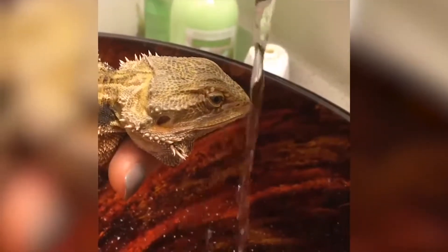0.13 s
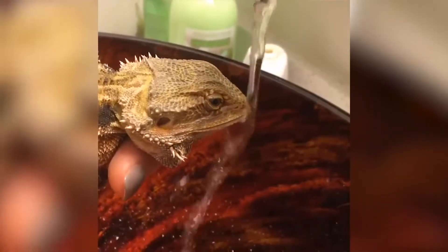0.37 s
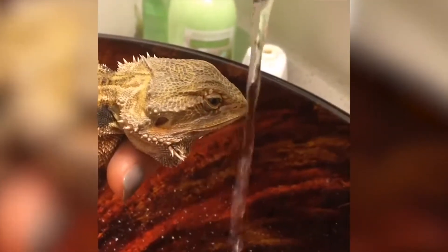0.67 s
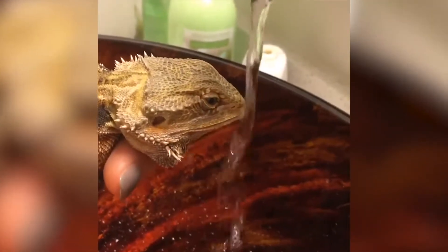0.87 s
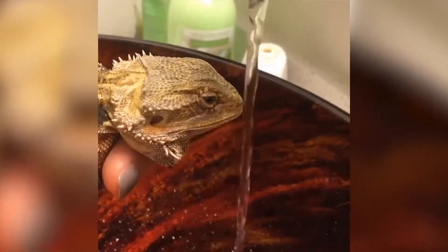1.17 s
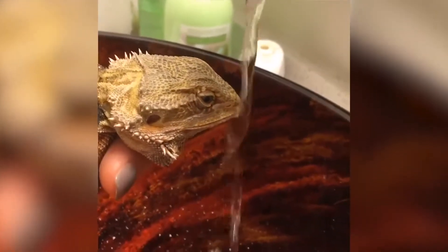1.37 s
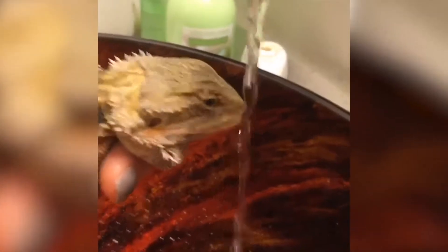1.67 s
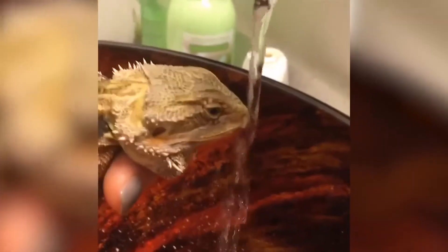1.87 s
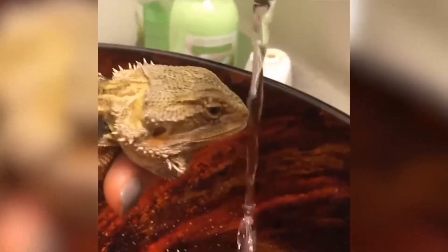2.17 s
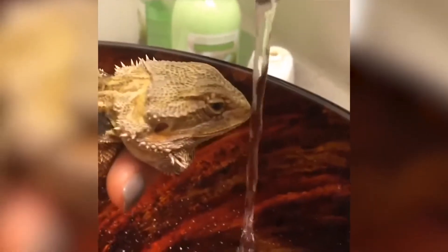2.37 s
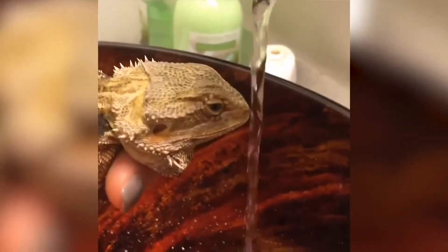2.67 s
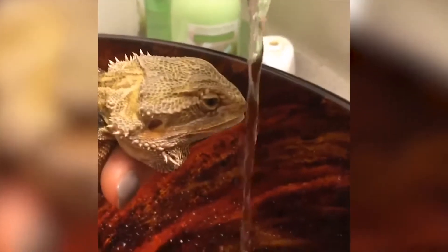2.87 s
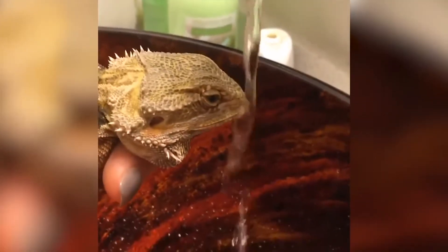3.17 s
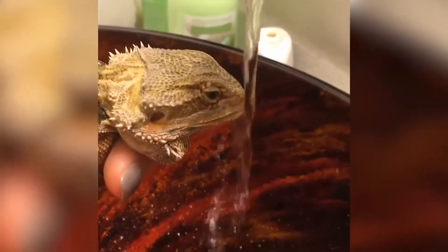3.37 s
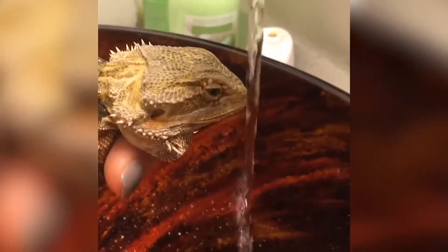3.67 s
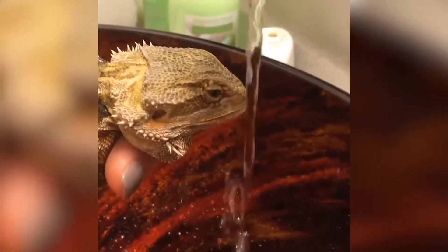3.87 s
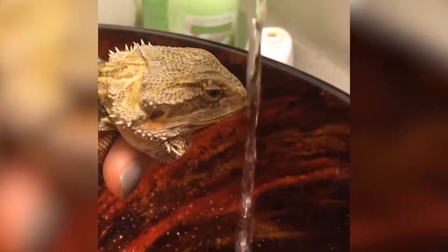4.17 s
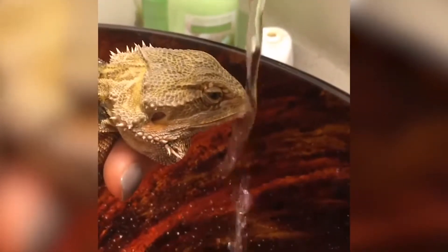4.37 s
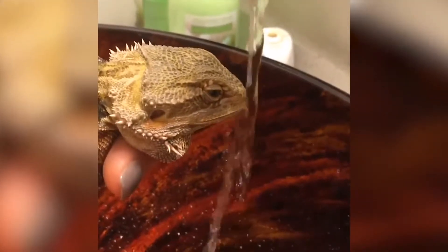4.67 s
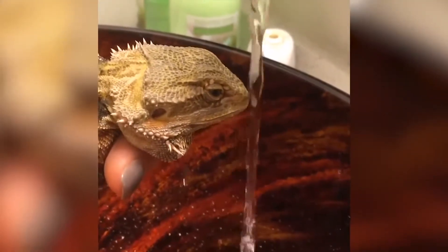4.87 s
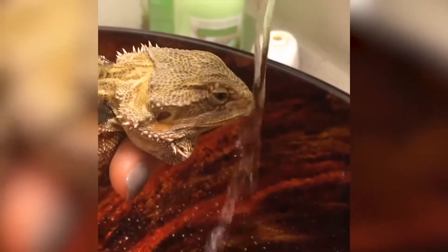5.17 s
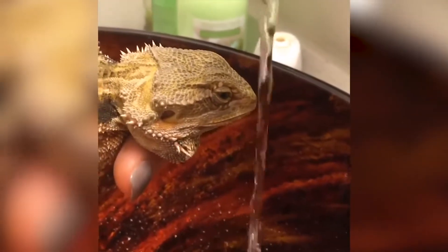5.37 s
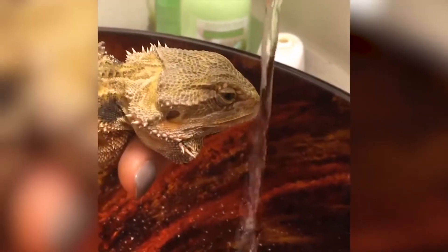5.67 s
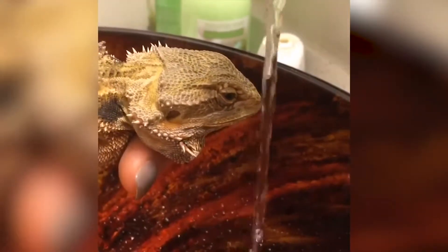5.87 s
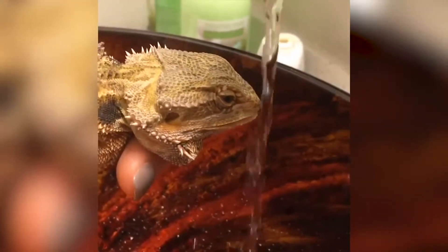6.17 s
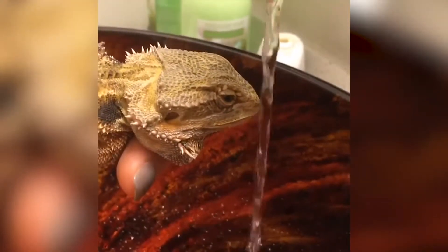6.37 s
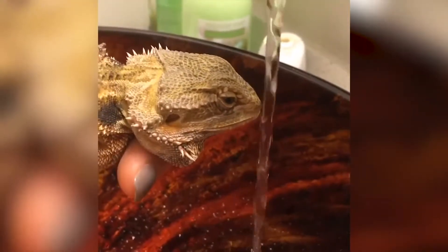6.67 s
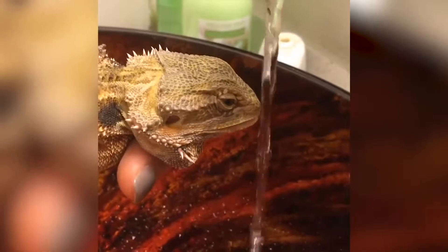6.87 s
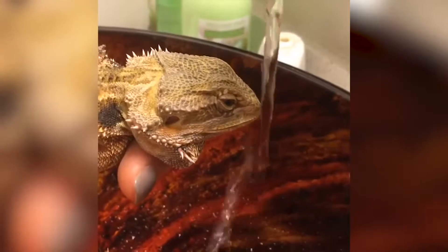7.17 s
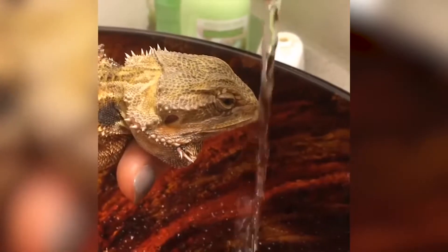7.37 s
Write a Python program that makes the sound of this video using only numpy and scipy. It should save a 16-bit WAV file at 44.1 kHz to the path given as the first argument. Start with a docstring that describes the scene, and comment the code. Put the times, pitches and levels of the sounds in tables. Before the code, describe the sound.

Close, quiet running water: fine hiss with a faint whistle, scattered drops plinking in a drain, tiny snaps of spray and occasional soft gurgles.

```python
"""A bathroom with small-room echoes: a thin stream runs from a tap into a basin, close to a mono microphone.
Turbulence, as shaped noise, hisses through the spout's narrow resonances and whistles thinly.
Drops trap bubbles, as dying sines of rising pitch, that plink through the modes of the hollow drain pipe.
Spray ticks and fizzes on the bowl; a few low glugs and soft bumps sound over a low, uneven rumble."""
import sys
import numpy as np
from scipy import signal
from scipy.fft import rfft, irfft
from scipy.io import wavfile
from scipy.ndimage import uniform_filter1d

SR = 44100
rng = np.random.default_rng(int(sys.argv[2]) if len(sys.argv) > 2 else 0)


def wav_record(signal):
    """Record a signal, one row per channel, as 16-bit PCM in the file named by sys.argv[1]."""
    frames = np.transpose(np.atleast_2d(signal))
    bounded = np.clip(frames, -1, 1)
    # unit amplitude maps onto the largest positive 16-bit level
    quanta = np.round(bounded * 32767).astype(np.int16)
    wavfile.write(sys.argv[1], SR, quanta)


N = 332073
TIME = np.arange(N) / SR  # s
TOP_HZ = 13850  # upper edge of the audible band, Hz


def undb(db):
    """Logarithmic level: decibels become an amplitude gain."""
    return 10 ** (np.asarray(db) / 20)


def unit(x):
    """Mean power: scale to rms 1."""
    return x / np.sqrt(np.mean(x ** 2))


def add(track, start, sound):
    """Superposition: add a sound to the track at a time in seconds."""
    i = int(np.clip(start * SR, 0, N - 1))
    track[i:i + len(sound)] += sound[:N - i]


def colour(x, points):
    """Spectral shaping: filter by (f/Hz, level/dB) points, joined along log frequency."""
    hz, db = np.transpose(points)
    f = np.maximum(np.fft.rfftfreq(N, 1 / SR), 1)
    gain = undb(np.interp(np.log(f), np.log(hz), db))
    return irfft(rfft(x) * gain, N)


def resonate(x, hz, width):
    """Simple resonance: one mode of given bandwidth, gain 1 at its centre."""
    b, a = signal.iirpeak(hz, hz / width, fs=SR)
    return signal.lfilter(b, a, x + 1e-18)  # the tiny offset keeps the filter out of denormal numbers


def walk(rate):
    """Random modulation: smoothed chance steps, rate per second, with a spread near 1."""
    k = int(SR / rate)
    steps = np.repeat(rng.standard_normal(N // k + 1), k)
    smooth = uniform_filter1d(uniform_filter1d(steps, k), k)
    return 1.3 * smooth[:N]


def ring(hz, t60, glide=0.):
    """Free damped oscillation: falls 60 dB in t60 while its pitch rises by the share glide."""
    t = TIME[:int(SR * np.clip(t60, .001, .2))]
    phase = 2 * np.pi * hz * t * (1 + glide * t / t60 / 2)
    return np.sin(phase) * np.exp(-np.log(1000) * t / t60)


def bubble(hz, cycles, glide=.06, swell_cycles=.8):
    """Volume pulsation of trapped air: a bubble swells over swell_cycles, then rings, rising in pitch."""
    tone = ring(hz, cycles / hz, glide)
    return tone * (1 - np.exp(-TIME[:len(tone)] * hz / swell_cycles))


def gulp(hz, length, swell, rise, tremble_db=2.0, tremble_s=0.0065):
    """Modulated oscillation: a bubble note swells, trembles and stops quickly; peak near 1."""
    t = TIME[:int(3 * length * SR)]
    tremble = undb(tremble_db * np.interp(t / tremble_s, np.arange(48), rng.standard_normal(48)))
    envelope = (1 - np.exp(-t / swell)) * np.exp(-(t / length) ** 2)
    phase = 2 * np.pi * hz * t * (1 + rise * t / length / 2)
    return np.sin(phase) * tremble * envelope / envelope.max()


def eddies(resonances, broad):
    """Turbulence noise: a flat power floor, broad, plus resonant peaks of (f/Hz, width/Hz, level/dB)."""
    f = np.fft.rfftfreq(N, 1 / SR)
    power = broad + sum(undb(db) ** 2 / (1 + (2 * (f - hz) / width) ** 2) for hz, width, db in resonances)
    return irfft(rfft(rng.standard_normal(N)) * np.sqrt(power), N)


def room(x, wet_db, t60, first_echo_s=0.0007, bass_hz=700, bass_stretch=1.96):
    """Diffuse reverberation: dense echoes die in t60, and bass_stretch times as slowly in the bass."""
    t = TIME[:SR // 2]
    echoes = rng.standard_normal(len(t))
    bass = signal.sosfiltfilt(signal.butter(3, bass_hz, fs=SR, output="sos"), echoes)
    fade = np.exp(-np.log(1000) * t / t60)
    tail = (echoes - bass) * fade + bass * fade ** (1 / bass_stretch)
    tail = tail * (t > first_echo_s)
    return x + undb(wet_db) * signal.fftconvolve(x, tail / np.linalg.norm(tail))[:len(x)]


# modes of the basin's hollow body: (f/Hz, level/dB, width/Hz)
BASIN_MODES = [(67.5, 10.5, 11), (113, 17.5, 10), (132.7, 10.5, 4.2), (250, 2.5, 27), (319, -5, 100),
               (372.6, 6.5, 8.2), (402, 3.5, 27), (548, -4, 24), (760, -20, 24), (970, -1, 51)]


def basin(x, plain_db=-16):
    """Modal resonance: the basin's body booms beside the plain sound."""
    return undb(plain_db) * x + sum(undb(db) * resonate(x, hz, width) for hz, db, width in BASIN_MODES)


# air-column modes of the drain pipe: (f/Hz, level/dB, width/Hz)
DRAIN_MODES = [(589, -2, 40), (993, -0.5, 50), (1303, -2, 45), (1733, 3.5, 55), (1995, -3.5, 55),
               (2383, 3, 48), (2770, -3, 48), (3295, -1, 55), (3601, -1, 50)]


def drain(x, direct_db=-14):
    """Air-column resonance: bubbles sound partly direct, mostly through the pipe's modes."""
    return undb(direct_db) * x + sum(undb(db) * resonate(x, hz, width) for hz, db, width in DRAIN_MODES)


# spectrum of the drumming: (f/Hz, relative level per Hz/dB)
RUMBLE_SPECTRUM = [(25, -39), (45, -11), (70, -1), (88, 0), (102, 0), (118, 2), (145, -5), (195, -22.5),
                   (380, -27.5), (600, -29.5), (1200, -76)]
# the drumming slowly comes and goes: (t/s, mean level/dB)
RUMBLE_LEVEL = [(0, -61.5), (1.5, -65), (3.6, -64), (4.25, -60), (4.7, -68), (5.2, -62.5), (5.9, -61),
                (6.35, -66), (7.53, -60)]


def rumble(swing_db=2.5, burble_db=-76, burble_swing_db=4, burble_low_hz=200, burble_high_hz=480):
    """Random forcing: the stream drums softly and unevenly on the basin, with a burble above the rumble."""
    drum_db = np.interp(TIME, *np.transpose(RUMBLE_LEVEL)) + swing_db * walk(13)
    drum = unit(colour(rng.standard_normal(N), RUMBLE_SPECTRUM)) * undb(drum_db)
    band = signal.butter(2, [burble_low_hz, burble_high_hz], "band", fs=SR, output="sos")
    burble = signal.sosfilt(band, basin(rng.standard_normal(N)))
    return drum + unit(burble) * undb(burble_db + burble_swing_db * walk(6.1))


def gurgle(count=70, level_db=-58, range_db=10, low_hz=130, octaves=1.71, fall_db_per_octave=4, length_s=0.014):
    """Random superposition: water swirling down the waste keeps up a faint, lumpy gurgle of low notes."""
    out = np.zeros(N)
    for when, faintness, pitch in rng.random((count, 3)):
        db = level_db - range_db * faintness - fall_db_per_octave * octaves * pitch
        note = gulp(low_hz * 2 ** (octaves * pitch), length_s, length_s / 3, 0.032)
        add(out, when * N / SR, undb(db) * note)
    return out


# soft bumps and rubs against the basin: (t/s, level/dB, length/s, band bottom f/Hz, band top f/Hz)
BUMPS = [(0.0, -53, 0.088, 128, 600), (1.772, -49.5, 0.0065, 178, 1000), (1.803, -64, 0.0068, 200, 1000),
         (0.82, -56.5, 0.13, 100, 190), (4.13, -59, 0.11, 60, 159), (5.111, -54.5, 0.11, 80, 190),
         (5.998, -48.5, 0.048, 74.6, 184), (6.441, -63.5, 0.096, 200, 900),
         (6.518, -56.5, 0.091, 224, 1090), (6.988, -60, 0.055, 60, 422), (7.24, -59.5, 0.078, 80, 450),
         (6.528, -48, 0.059, 64, 168), (6.561, -48.5, 0.025, 60.5, 169)]


def bumps(rise_share=0.04, slips_per_s=110, lumpy_db=4, scrape_db=-9):
    """Stick-slip friction: a short run of uneven slips and a little scraping excite the basin's body."""
    out = np.zeros(N)
    t = TIME[:SR]
    for start, db, length, low_hz, top_hz in BUMPS:
        gaps, sizes = rng.uniform(-1, 1, (2, 64))
        times = np.r_[0, np.cumsum(1 + .7 * gaps[1:])] / slips_per_s + rise_share * length
        kicks = undb(lumpy_db * sizes) * rng.choice([-1, 1], len(sizes))
        slips = np.bincount((times * SR).astype(int), kicks, SR)[:SR]
        force = slips * np.sqrt(SR / slips_per_s) + undb(scrape_db) * rng.standard_normal(SR)
        push = np.minimum(t / (rise_share * length), 1) * np.exp(-(t / length) ** 4)
        band = signal.butter(3, [low_hz, top_hz], "band", fs=SR, output="sos")
        thud = basin(signal.sosfilt(band, force * push))
        # the level holds for the time of the push, not for the whole second
        add(out, start, undb(db) * unit(thud) * np.sqrt(np.mean(push ** 2)))
    return out


# low glugs in the waste pipe:
# (t/s, peak level before trembling/dB, f/Hz, length/s, swell/s, pitch rise as a share over that length)
GLUGS = [(0.003, -45, 274.5, 0.026, .004, .03), (0.012, -45, 558, 0.016, 0.0018, 0.03),
         (0.08, -58, 317, 0.055, .004, .03), (0.133, -50.5, 275, 0.013, .004, 0.037),
         (0.312, -59, 282, 0.019, .004, 0.037), (0.82, -57.5, 367, .035, 0.0033, .04),
         (0.884, -58.5, 350, .025, .005, 0.035), (0.9272, -32.5, 523, 0.0073, 0.0037, 0.038),
         (0.942, -34.5, 557, 0.0098, .008, .04), (0.957, -40.5, 568, .011, .008, 0.042),
         (0.984, -58, 755, .018, .01, 0.49), (0.999, -51, 580, 0.027, .004, .01),
         (1.078, -59, 381, 0.033, .015, .03), (3.835, -41.5, 560, 0.017, 0.0024, 0.044),
         (4.212, -33, 581, .02, 0.0018, 0.023), (5.116, -56.5, 377, 0.022, .005, 0.048),
         (5.148, -55.5, 300, .018, .004, .04), (5.216, -63, 363, 0.024, 0.0037, .03),
         (5.531, -63, 367, .025, .004, 0.031), (5.999, -45.5, 318, 0.013, .005, 0.09),
         (6.018, -44, 370, 0.015, 0.0036, .07), (6.039, -45, 341, .018, .004, .07),
         (6.081, -55, 386, 0.036, .008, 0.022), (6.277, -49, 985, 0.023, .025, .01),
         (6.335, -48, 966, 0.014, 0.0067, 0.017), (6.432, -58.5, 582, 0.024, .012, 0.045),
         (6.435, -57, 331, 0.036, 0.01, 0.026), (6.476, -57, 245, 0.022, .005, .04),
         (6.514, -57, 715, .012, .003, 0.046), (6.531, -47.5, 269, 0.018, 0.0032, .08),
         (6.558, -48, 372, 0.021, 0.0036, 0.073), (6.575, -52, 280, 0.017, 0.0037, .08),
         (6.609, -53, 370, .035, .008, 0.018), (6.668, -56.5, 388, 0.022, .008, .05),
         (7.251, -58, 375, 0.029, .008, .05)]


def glugs(count=4, after_db=-21, after_s=.04, after_octaves=0.32, after_length_s=0.0055):
    """Low bubble resonance: large bubbles gulp in the waste pipe; a few small ones break off each."""
    out = np.zeros(N)
    for start, db, hz, length, swell, rise in GLUGS:
        add(out, start, undb(db) * gulp(hz, length, swell, rise))
        for when, pitch in rng.random((count, 2)):
            chip = gulp(hz * 2 ** (after_octaves * pitch), after_length_s, after_length_s / 2, rise)
            add(out, start + when * after_s, undb(db + after_db) * (1 - when / 2) * chip)
    return out


# a burst of splatter on the bowl: (t/s, starting level/dB, decay time to 1/e/s)
SPLATTER = (0.0, -45, 0.055)
# spectrum of the splatter: (f/Hz, relative level per Hz/dB)
SPLATTER_SPECTRUM = [(100, -14), (300, -5), (560, -1), (1100, -7), (1500, -12), (2500, -6), (3500, -13),
                     (4400, -10), (8000, -16.5), (13000, -21)]


def splatter(count=1500, scatter_db=4):
    """Impulsive shot noise: a dense shower of tiny impacts, hard at first and quickly dying away."""
    start, db, decay = SPLATTER
    when, sign = rng.random((count, 2)).T
    delay = 4 * decay * when
    hits = undb(scatter_db * rng.standard_normal(count)) * np.sign(sign - .5) * np.exp(-delay / decay)
    # a second of silence in front keeps the filter from wrapping round
    impacts = np.bincount(((start + delay) * SR).astype(int) + SR, hits, N)
    shower = colour(impacts, SPLATTER_SPECTRUM)[SR:]
    starting_rms = np.sqrt(np.sum(shower ** 2) / (decay * SR / 2))
    return np.r_[undb(db) * shower / starting_rms, np.zeros(SR)]


# tiny bubbles that sing for a moment on the bowl: (t/s, peak level before trembling/dB, f/Hz, length/s)
PIPS = [(0.557, -46, 5880, .008), (0.85, -58, 5880, .04), (3.628, -55, 3550, 0.037),
        (3.856, -45.5, 5690, 0.0095), (3.857, -50, 5240, .016), (6.341, -50, 5870, 0.025),
        (7.111, -55, 5260, .02)]


def pips(swell_s=0.0015, rise=0.003):
    """Small-bubble resonance: little trapped air sings a thin, high note."""
    out = np.zeros(N)
    for start, db, hz, length in PIPS:
        add(out, start, undb(db) * gulp(hz, length, swell_s, rise))
    return out


# a snap falls 60 dB within this many cycles, so the high ones are the shortest
TICK_CYCLES = 46
# spray that snaps on the bowl: (t/s, peak level/dB, f/Hz)
TICKS = [(1.684, -34, 11300), (4.065, -37, 5570), (4.0732, -24.5, 5400), (4.148, -36, 3550),
         (4.15, -38, 5200), (4.595, -25.5, 3700), (4.596, -24, 5500), (4.847, -32, 10900),
         (5.2013, -24.5, 7960), (5.303, -34.5, 11300), (6.305, -47, 11000), (7.398, -31, 7400)]


def ticks(splash_db=-4, splash_width=0.92, rise_s=0.000083):
    """Transient excitation: tiny bubbles snap in a very short ring with a burst of spray."""
    out = np.zeros(N)
    for start, db, hz in TICKS:
        t60 = TICK_CYCLES / hz
        tone = ring(hz, t60)
        t = TIME[:len(tone)]
        spray = resonate(rng.standard_normal(SR // 2), hz, hz * splash_width)
        spray = unit(resonate(spray, hz, hz * splash_width))[:len(t)]
        burst = undb(splash_db) * spray * np.exp(-np.log(1000) * t / t60)
        snap = (tone + burst) * (1 - np.exp(-t / rise_s))
        add(out, start, undb(db) * snap / np.abs(snap).max())
    return out


def fizz(count=6000, level_db=-53, range_db=9, centre_hz=5500, octaves=0.45, cycles=110, glide=0.011):
    """Incoherent summation: where the stream lands, countless pinhead bubbles merge into a fine rush."""
    out = np.zeros(N)
    for (when, faintness, length), pitch in zip(rng.random((count, 3)), rng.standard_normal(count)):
        hz = min(centre_hz * 2 ** (octaves * pitch), TOP_HZ)
        pinhead = bubble(hz, cycles * (.5 + length), glide, swell_cycles=10.6)
        add(out, when * N / SR, undb(level_db - range_db * np.sqrt(faintness)) * pinhead)
    return out


def patter(count=640, level_db=-39.0, range_db=14, centre_hz=1900, octaves=0.37, cycles=9):
    """Random arrivals: a dense, uneven trickle of faint droplets keeps exciting the drain."""
    out = np.zeros(N)
    for (when, faintness, length), pitch in zip(rng.random((count, 3)), rng.standard_normal(count)):
        droplet = bubble(centre_hz * 2 ** (octaves * pitch), cycles * (.5 + length))
        add(out, when * N / SR, undb(level_db - range_db * np.sqrt(faintness)) * droplet)
    return drain(out)


# clear drops, each trapping a bubble in the drain:
# (t/s, peak level before room echoes/dB, f/Hz, cycles until the bubble has died)
DROPS = [(0.015, -42, 1020, 7.1), (0.057, -45, 1310, 5), (0.106, -47, 2300, 7), (0.207, -48.5, 1760, 5.7),
         (0.609, -51, 1850, 3.4), (0.821, -43.5, 1680, 4.9), (0.893, -45, 2470, 3.7),
         (0.9275, -45, 1860, 8), (0.929, -47.5, 960, 19), (1.012, -46.5, 1980, 7), (1.104, -48, 1940, 5.4),
         (1.141, -45, 1680, 5.7), (1.156, -39, 1860, 10), (1.634, -40, 1770, 8.6), (1.653, -34, 2210, 2.5),
         (1.84, -46, 1810, 6.7), (1.988, -29, 2190, 9.5), (2.072, -42, 2100, 3.3), (2.196, -49, 1900, 4.3),
         (2.329, -48, 2330, 7), (2.447, -31.5, 1870, 5), (2.4724, -25, 985, 6.4), (2.473, -36, 1730, 15),
         (2.677, -50, 2010, 5), (2.702, -44, 2280, 14), (2.954, -53, 1800, 2.7), (3.136, -42, 2150, 4.2),
         (3.362, -46, 1730, 9.6), (3.4019, -37, 1760, 6.1), (3.4025, -40.5, 626, 2.5),
         (3.53, -43, 735, 4.7), (3.609, -46, 1880, 4), (3.621, -47, 1800, 6.4), (3.802, -44, 2370, 6.1),
         (3.837, -40.5, 1730, 2.2), (3.871, -47.5, 1810, 8), (3.9099, -34.5, 1360, 4.1),
         (3.911, -40.5, 574, 4), (3.941, -37, 1980, 9), (3.9471, -28.5, 950, 6.8), (3.975, -40, 1700, 7.4),
         (4.079, -39.5, 1420, 9.6), (4.114, -47, 1050, 7.1), (4.1546, -27, 1640, 7.9),
         (4.214, -42, 1740, 2.6), (4.416, -34, 2140, 5.2), (4.571, -32, 2600, 6.2), (4.787, -33, 1700, 13),
         (5.101, -33.5, 2160, 4.8), (5.279, -43, 2920, 1.9), (5.365, -33, 2720, 3.8),
         (5.442, -53, 1720, 12), (5.49, -46, 2010, 5), (5.513, -40, 1500, 3.5), (5.8004, -32.5, 1910, 2.8),
         (5.846, -47, 1900, 4.8), (5.934, -25, 2560, 2.6), (6.149, -47.5, 1780, 16),
         (6.3335, -38.5, 3240, 28), (6.334, -43.5, 1680, 16), (6.366, -48, 1730, 14),
         (6.461, -51, 1900, 3.3), (6.56, -47, 1750, 5.2), (6.7489, -31, 1500, 5.3), (6.915, -47, 1740, 8.6),
         (6.9285, -36, 760, 4), (7.034, -52, 1300, 20), (7.07, -46.5, 2150, 5.4), (7.091, -26.5, 1360, 8),
         (7.111, -39, 1660, 2.3), (7.13, -46, 1330, 26), (7.2027, -35.5, 1930, 18),
         (7.2303, -40, 1900, 3.3), (7.231, -51.5, 1000, 14), (7.354, -48, 1750, 8.4),
         (7.374, -49.5, 1740, 9)]


def drops(count=5, after_db=-12, after_s=.035, fade_db_per_s=300, after_octaves=0.22,
          splat_db=-20, splat_s=0.0093, splat_width=0.78):
    """Bubble entrainment: each drop splats, then sheds ever sparser, weaker bubbles; each has its own echoes."""
    out = np.zeros(N)
    t = TIME[:SR // 5]
    for start, db, hz, cycles in DROPS:
        first = bubble(hz, cycles)
        splat = resonate(rng.standard_normal(len(t)), hz, hz * splat_width)
        splat = unit(resonate(splat, hz, hz * splat_width))
        splash = undb(splat_db) * splat * np.exp(-t / splat_s) * np.abs(first).max()
        add(splash, 0, first)
        for k, (when, pitch) in enumerate(rng.random((count, 2))):
            delay = after_s * ((k + 1 + when) / (count + 1)) ** 2
            later = bubble(hz * 2 ** (after_octaves * (2 * pitch - 1)), cycles)
            add(splash, delay, undb(after_db - fade_db_per_s * delay) * later)
        plink = drain(splash)
        add(out, start, undb(db) * room(plink / np.abs(plink).max(), wet_db=-7.0, t60=0.15))
    return out


# resonances of the valve and spout: (f/Hz, width/Hz, level/dB)
SPOUT = [(1225, 40, 12), (1320, 60, 9), (2020, 40, 3), (2380, 35, 7), (2790, 60, 5), (3145, 34, 6),
         (4520, 18, 4.5), (4560, 22, 6), (4830, 45, 1.5), (5265, 30, 2), (5995, 36, 0.5), (6933, 16, 11),
         (8150, 80, 3), (8410, 50, 3), (10025, 22, 13), (10256, 22, 10), (10920, 150, 4), (13720, 150, 9)]
# broad hiss of the jet: (f/Hz, relative level per Hz/dB)
HISS_SPECTRUM = [(200, -12), (600, -8), (900, -11.5), (1450, -2), (2100, -8.5), (2550, -14), (3000, 0.5),
                 (4100, -4), (5800, 4.5), (7600, -1.5), (9100, -2.5), (10450, 4), (11200, 1.5),
                 (13200, -6.5)]
# the spout's thin whistle: (f/Hz, width/Hz, level/dB)
WHISTLE = [(8830, 60, -12), (8915, 50, -11), (9146, 26, -1.5), (9230, 80, -9), (9320, 40, -10),
           (9386, 30, -5)]
# the whistle slowly swells and eases: (t/s, level before whistle_db is added/dB)
WHISTLE_LEVEL = [(0.1, -57.5), (2.76, -57.5), (3.05, -54), (7.24, -57.5), (7.4, -56)]
# pitches that the spout swallows: (f/Hz, width/Hz)
SPOUT_NOTCHES = [(2590, 24), (9800, 315), (10490, 1300), (13000, 260)]


def tap(hiss_db=-53.5, whistle_db=1, flutter_db=2.14, waver_db=1.22, flicker_db=3.0):
    """Flow noise: turbulence in the valve hisses and rings the spout, which also whistles thinly."""
    hiss_level = hiss_db + flutter_db * walk(55)
    hiss = unit(colour(eddies(SPOUT, broad=0.28), HISS_SPECTRUM)) * undb(hiss_level)
    whistle_level = np.interp(TIME, *np.transpose(WHISTLE_LEVEL)) + whistle_db + waver_db * walk(14)
    whistle = unit(eddies(WHISTLE, broad=0)) * undb(whistle_level)
    jet = hiss + whistle
    for hz, width in SPOUT_NOTCHES:
        jet = jet - resonate(jet, hz, width)
    # the middle of the hiss flickers as the stream wobbles
    return jet + (undb(flicker_db * walk(25)) - 1) * resonate(jet, 2200, 940)


def scene():
    """Superposition: the hiss bounces inside the bowl, the splashes reach the walls; both channels are equal."""
    splashes = patter() + fizz() + splatter() + ticks() + pips() + glugs() + gurgle() + bumps()
    hiss_in_bowl = room(tap(), wet_db=-6.0, t60=0.087)
    splashes_in_room = room(splashes, wet_db=-7.5, t60=0.12)
    mono = hiss_in_bowl + rumble() + drops() + splashes_in_room
    return np.array([mono, mono])


def record(dry):
    """Band limiting: a steep elliptic low-pass cuts the top."""
    return signal.sosfilt(signal.ellip(12, .2, 70, TOP_HZ, fs=SR, output="sos"), dry)


dry = scene()
out = record(dry)
wav_record(out)
```